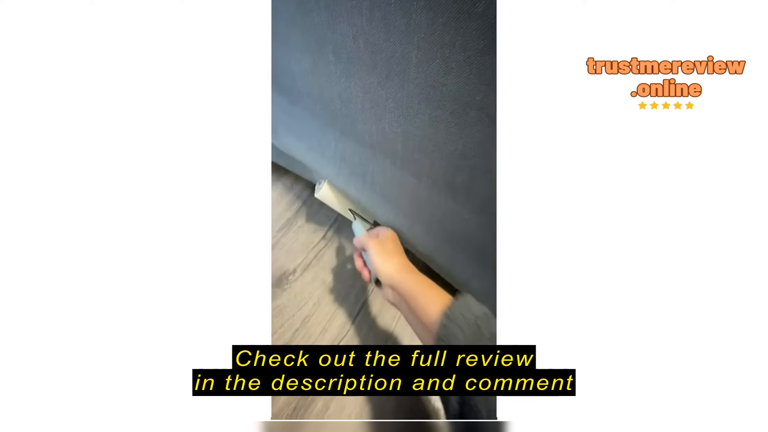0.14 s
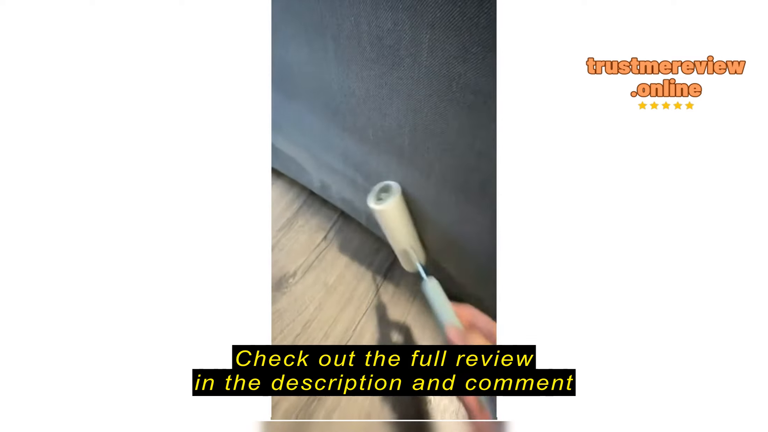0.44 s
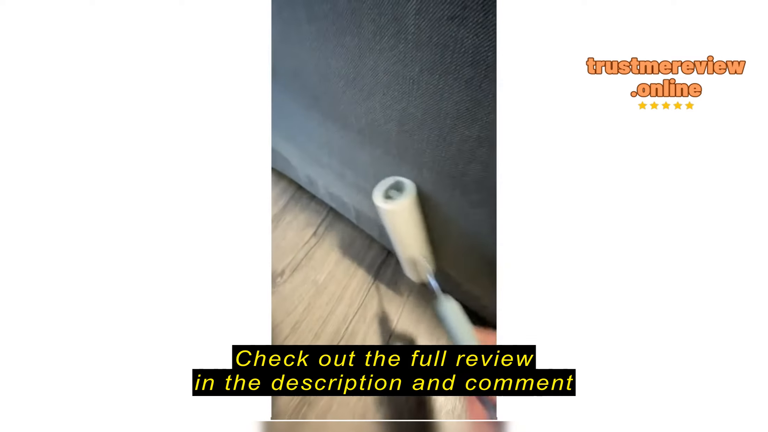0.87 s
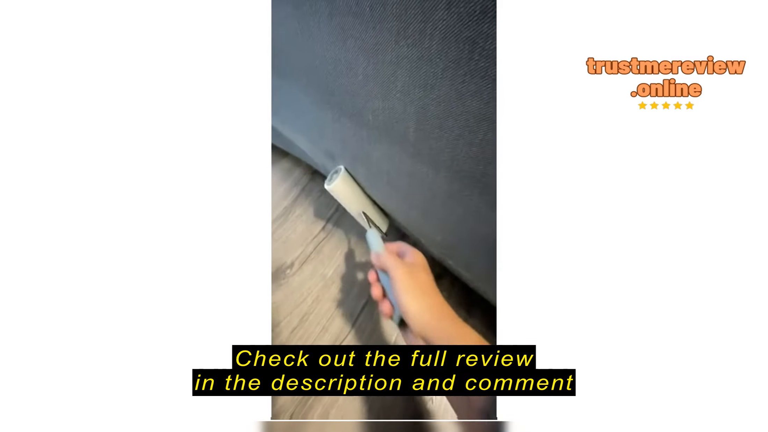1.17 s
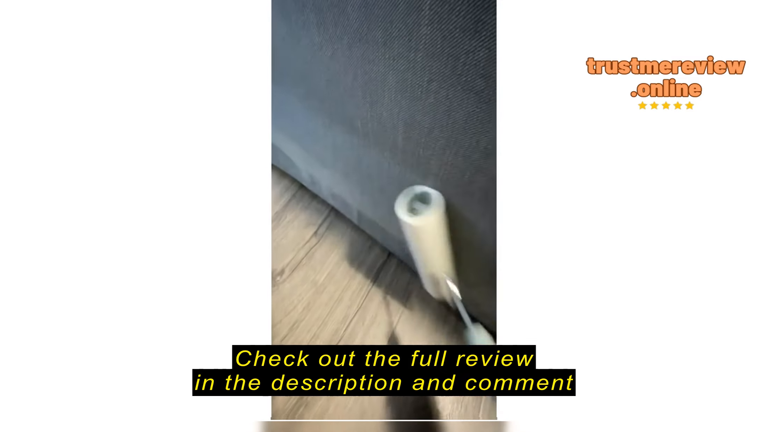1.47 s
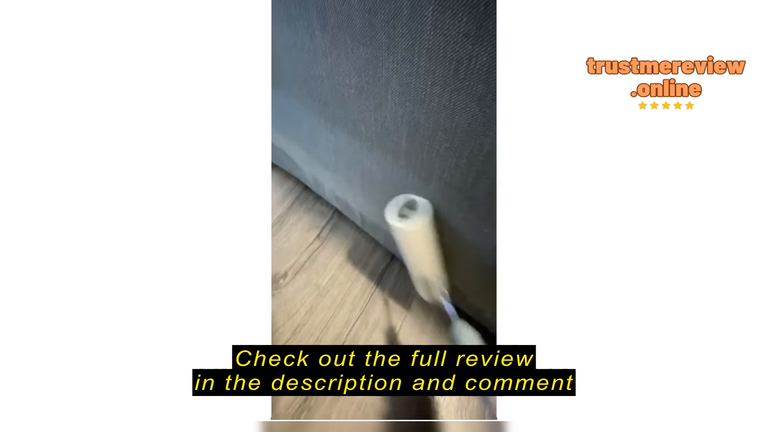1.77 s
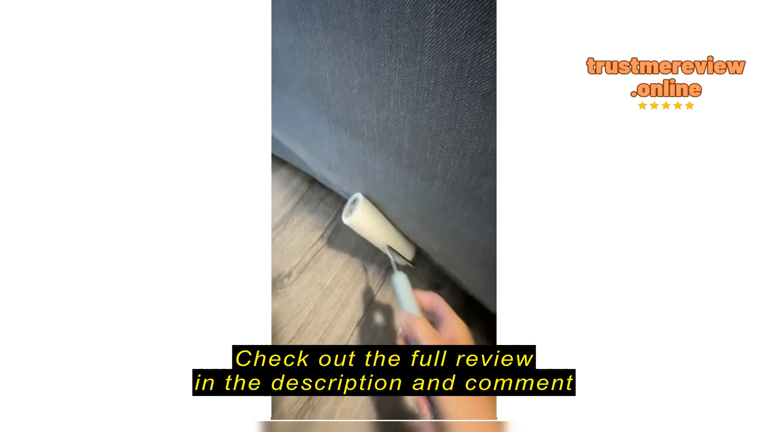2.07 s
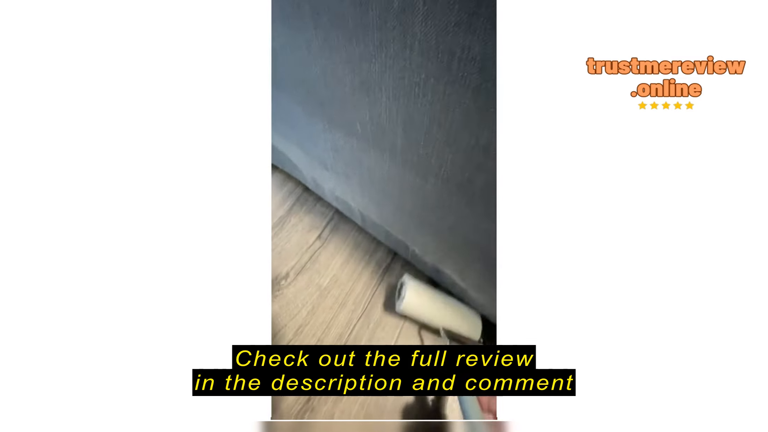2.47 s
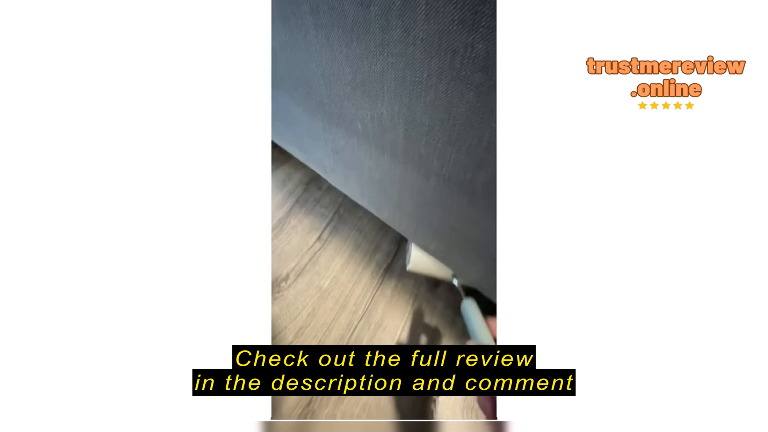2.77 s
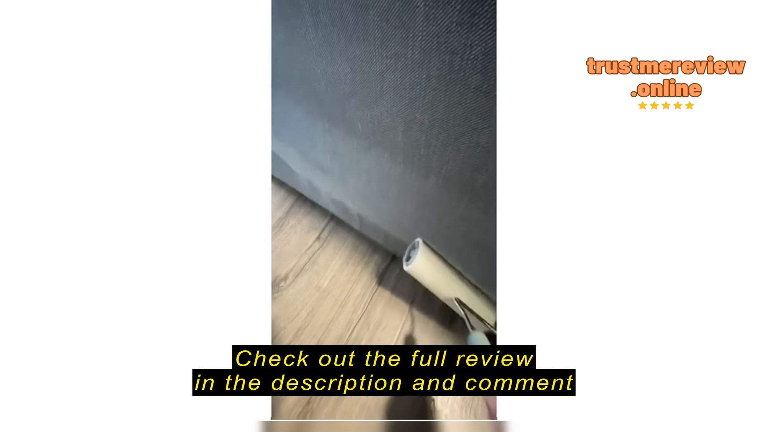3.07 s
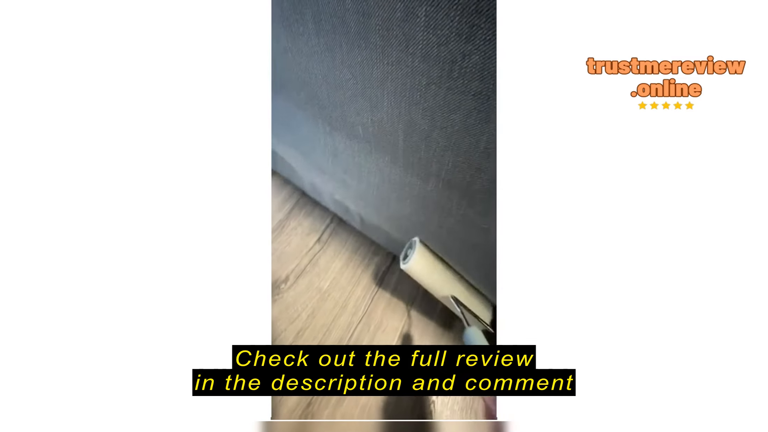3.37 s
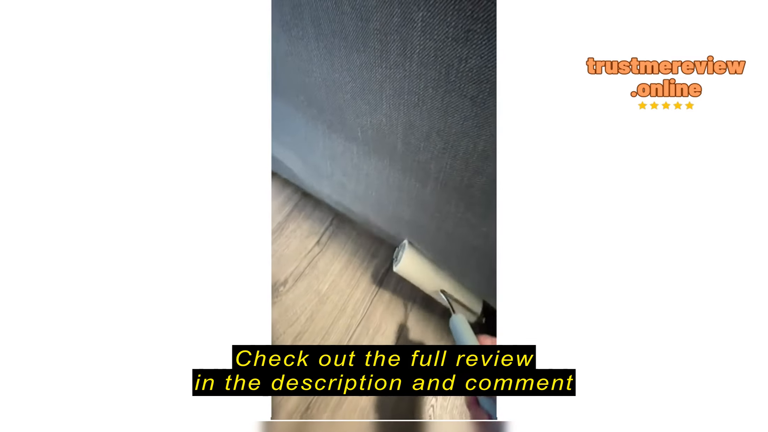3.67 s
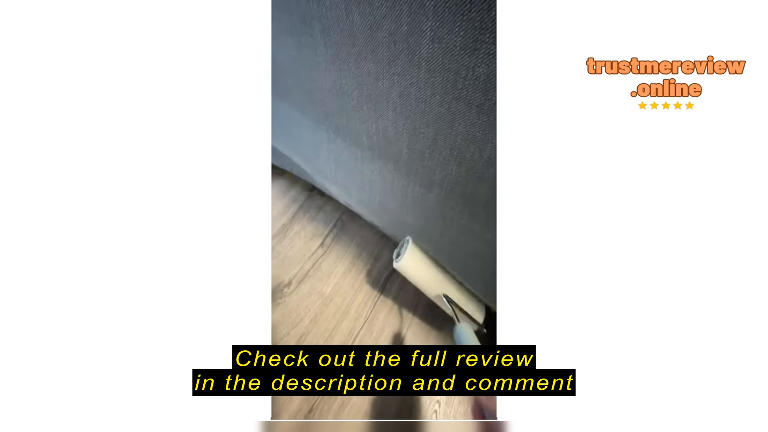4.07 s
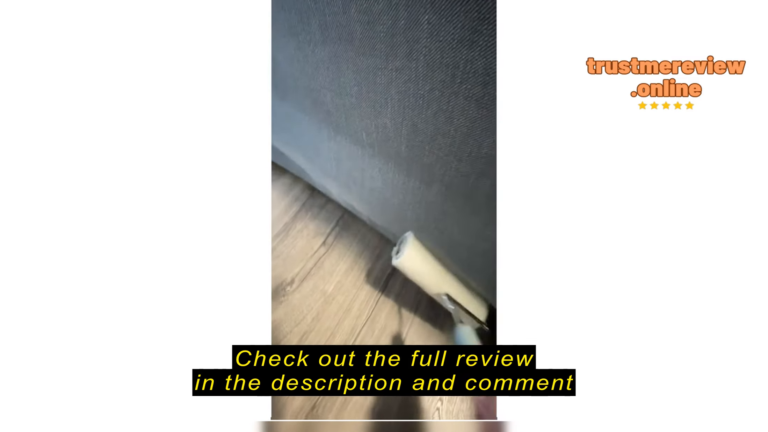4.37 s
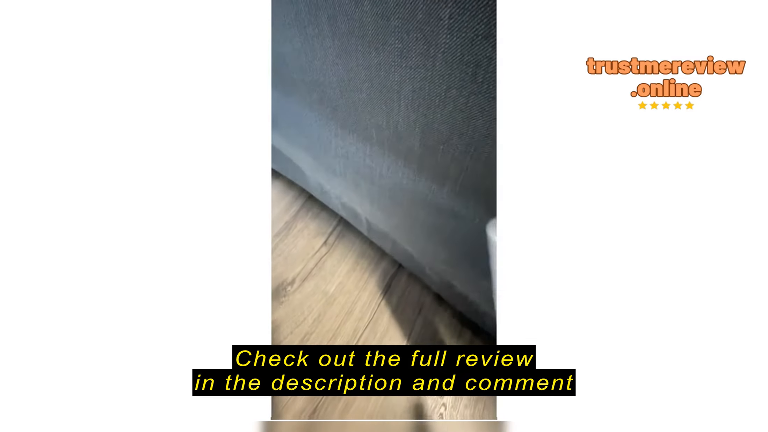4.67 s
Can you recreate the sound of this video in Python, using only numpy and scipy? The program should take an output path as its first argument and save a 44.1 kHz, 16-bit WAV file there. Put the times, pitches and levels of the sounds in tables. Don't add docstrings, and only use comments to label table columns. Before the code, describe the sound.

A hollow plastic lint roller is rubbed back and forth on couch cloth close to a phone microphone in a quiet room. Irregular short strokes hiss and rasp with a hollow tube colour, over faint frame rumble and handle knocks. A soft deep thump lands late, the rubbing ends abruptly, then after a brief silence only quiet room tone returns.

```python
import sys
import numpy as np
from scipy import signal
from scipy.fft import rfft, irfft, next_fast_len
from scipy.io import wavfile
from scipy.ndimage import uniform_filter1d

SR = 44100
rng = np.random.default_rng(int(sys.argv[2]) if len(sys.argv) > 2 else 0)


def invert_db(level):
    return 10 ** (np.asarray(level, dtype=float) / 20)


def unload_audio(sound):
    columns = np.transpose(np.atleast_2d(sound))
    steps = np.round(np.clip(columns, -1, 1) * 32767)
    wavfile.write(sys.argv[1], SR, steps.astype(np.int16))


N = 340893
SIZE = next_fast_len(N)
TIME = np.arange(N) / SR
HZ = np.arange(SIZE // 2 + 1) * SR / SIZE
CUT_S, ROOM_BACK_S = 6.236, 6.49


def shape(x, gain):
    return irfft(rfft(x, SIZE) * gain, SIZE)[..., :N]


def unit(x):
    return x / np.sqrt(np.mean(np.atleast_2d(x).mean(axis=0) ** 2))


def along(table, column=1):
    rows = np.array(table, float)
    return np.interp(np.log(HZ + 1), np.log(rows[:, 0]), rows[:, column])


def resonances(modes):
    power = 0
    for hz, width, db in modes:
        detuning = (HZ - hz) / (width / 2)
        power = power + invert_db(db) ** 2 / (1 + detuning ** 2) ** 2
    return np.sqrt(power)


def box(lo, hi):
    return 1 / (1 + ((2 * HZ - lo - hi) / (hi - lo)) ** 12)


def walk(rate):
    k = int(SR / rate)
    held = np.repeat(rng.standard_normal(N // k + 1), k)
    return 1.64 * uniform_filter1d(uniform_filter1d(held, k), k)[:N]


def patchy(pair, modes, patchy_db, rate):
    return [shape(pair, resonances([mode])) * invert_db(patchy_db * walk(rate)) for mode in modes]


def ring(hz, t60, rise, order=1):
    t = np.arange(int(.3 * SR)) / SR
    return np.sin(2 * np.pi * hz * t) * 1000. ** (-t / t60) * (1 - np.exp(-t / rise)) ** order


def add(out, s, sound):
    i = int(s * SR)
    out[..., i:i + sound.shape[-1]] += sound[..., :N - i]


def sides(pan_db):
    return np.array([[pan_db], [-pan_db]]) / 2


# frequency in Hz, lead of the right side in radians.
LEAD = [(0, 0), (250, .2), (350, .6), (520, 2.5), (1000, 3.2), (1400, 4.2), (2000, 4.6), (2800, 3.7),
        (4100, 4.3), (5200, 5.0), (7350, 3.14), (14700, -3.14), (22050, -9.4)]


def lead():
    return np.exp(1j * np.interp(HZ, *np.transpose(LEAD)))


# frequency in Hz, likeness from 0 to 1, left minus right in dB.
PORTS = [(59.6, 0.88, 0.6), (170, 0.92, -4), (350, 0.51, -3.5), (521, 0.74, -3.5), (980, 0.57, -1.5),
         (1580, 0.5, -2.5), (2430, 0.94, -1), (3720, 0.06, -2), (5200, .7, 0.5), (7300, 0.67, -.4),
         (15000, 0.1, -0.7)]


def ports(shared, own):
    like, pan = np.clip(along(PORTS), 0, 1), invert_db(along(PORTS, column=2) / 2)
    right = shape(shared, like * lead() / pan) + shape(own, np.sqrt(1 - like ** 2) / pan)
    return np.array([shape(shared, pan), right])


# start of full speed in seconds, its end in seconds,
# fibre hiss at first in dB, hiss at last in dB, tube ring above hiss in dB.
STROKES = [(0, 0.228, -56, -61.5, -.5), (0.392, 0.568, -69, -69.5, 0), (0.586, 0.786, -74, -78, 5),
           (0.815, 0.973, -63.5, -60.5, -1), (1.121, 1.18, -64.5, -63.5, 3), (1.25, 1.394, -76.5, -74, 0.5),
           (1.652, 1.804, -74, -73, 4.5), (1.843, 1.98, -83.5, -83, 14.5), (2.15, 2.196, -78, -80.5, 8.5),
           (2.263, 2.435, -61, -67.5, 9), (2.521, 2.638, -71.5, -73, 9), (2.69, 3.014, -82, -71, 6),
           (3.08, 3.286, -80.5, -76.5, 2), (3.439, 3.668, -73.5, -68, 1.5), (3.678, 3.773, -68.5, -72.5, 2),
           (3.974, 4.302, -76, -77, 7), (4.339, 4.448, -66.5, -77, 0.5), (4.557, 4.818, -71.5, -74, 2),
           (4.963, 5.017, -80.5, -76, 14), (5.062, 5.272, -64.5, -66, -2.5),
           (5.546, 5.698, -82, -78.5, 3.5), (5.857, 6.042, -82, -77, 10), (6.148, 6.301, -75.5, -78, 1.5)]
# time in seconds, fibre hiss in dB, tube ring above hiss in dB.
SCUFFS = [(0.302, -80.5, -1), (2.29, -62, 7.5), (0.93, -56.5, -2), (1.345, -68.5, 17.5), (1.437, -73, 8),
          (2.574, -68, 4), (3.326, -72, 1.5), (5.313, -66.5, 11.5), (5.419, -78.5, 6), (1.528, -82, 7),
          (5.49, -82, 3), (3.91, -91, -5), (1.49, -86, 8), (5.223, -65, 3.5), (5.757, -82, 9.5),
          (5.802, -69.5, 6)]


def motion():
    rows = [(*stroke, 300, 348) for stroke in STROKES]
    rows += [(s, s + .001, db, db, tube, 298.5, 350) for s, db, tube in SCUFFS]
    t = TIME[::64]
    rest_db, rest_tube_db = -92.5, 3.5
    power = invert_db(rest_db) ** 2
    ring_db = rest_tube_db * power
    for start, end, first_db, last_db, tube, up, down in rows:
        level = np.interp(t, (start, end), (first_db, last_db))
        level = level - up * np.maximum(start - t, 0) - down * np.maximum(t - end, 0)
        part = invert_db(level) ** 2
        power, ring_db = power + part, ring_db + tube * part
    return np.interp(TIME, t, 10 * np.log10(power)), np.interp(TIME, t, ring_db / power)


def slips(rate, spread_db):
    caught = rng.random((2, N)) < rate / SR
    return caught * rng.standard_normal((2, N)) * invert_db(spread_db * rng.exponential(size=(2, N)))


# frequency in Hz, level in dB per Hz.
FIBRES = [(1500, -23), (2500, -1), (4200, -7.5), (5300, -4.5), (7000, -6.5), (9000, -10), (11000, -11),
          (13500, -14.5), (15500, -8), (16500, -33.5)]
# frequency in Hz, width in Hz, level in dB.
TUBE = [(482, 280, 1), (660, 250, -3), (787, 184, 2), (917, 82, -3.5), (1144, 210, -1.5)]
# frequency in Hz, width in Hz, level in dB.
CLOTH = [(1243, 410, 10.5), (1805, 980, 13.5), (2330, 160, -16.5)]
# time in seconds, tube note in Hz, pressure into the weave in dB.
GRIP = [(0, 680, 3), (.2, 650, 2), (.37, 840, -0.5), (.58, 600, 3.5), (1.0, 780, 2.5), (1.14, 1000, 3.5),
        (1.3, 760, -1.5), (1.55, 620, 4), (2.15, 770, 5), (2.27, 860, 2), (2.4, 868, 1), (2.64, 820, 1),
        (3.0, 720, 3.5), (3.35, 670, 0.5), (3.55, 690, 6), (3.9, 540, 2.5), (4.02, 700, 2), (4.2, 710, 2),
        (4.4, 720, 0.5), (4.9, 630, 3.5), (5.17, 870, 1), (5.42, 480, 0.5), (6.2, 700, 2.5)]


def roller():
    hiss_db, tube_db = motion()
    s, *columns = np.transpose(GRIP)
    note_hz, press_db = (np.interp(TIME, s, c) for c in columns)
    cloth_db = press_db - 0.18 * (hiss_db + 72.5)
    pair = ports(*slips(14000, 1.47))

    pile = shape(pair, invert_db(along(FIBRES)))
    upper = shape(pile, 1 / (1 + (6000 / (HZ + 1)) ** 4))
    pile = (pile - upper) * invert_db(.8 * walk(18)) + upper * invert_db(1.1 * walk(18))
    hiss = unit(pile) * invert_db(3.0)

    damp_db_per_neper, most_damp_db = 58, 17
    share = []
    for hz, *_ in TUBE:
        damp_db = damp_db_per_neper * np.abs(np.log(note_hz / hz))
        share.append(invert_db(-np.minimum(damp_db, most_damp_db)))
    share = np.array(share)
    share = share / np.sqrt(np.mean(share ** 2, axis=0))
    modes = patchy(pair, TUBE, 1.5, 30)
    weave = patchy(pair, CLOTH, 1.5, 20)
    tube = unit(sum(g * m for g, m in zip(share, modes))) * invert_db(tube_db + 0.55)
    cloth = unit(sum(weave)) * invert_db(cloth_db - 1.3)
    return invert_db(hiss_db + 0.69 * walk(30)) * (hiss + tube + cloth)


# time in seconds, rumble in dB, cushion flutter in dB, half length in seconds.
SHOVES = [(0.053, -67, -67, 0.13), (.33, -58.5, -85, 0.17), (0.957, -71, -56.5, 0.11),
          (1.07, -50, -73, 0.074), (1.182, -58, -53, 0.037), (1.274, -52.5, -76, 0.044),
          (1.362, -60, -57.5, 0.064), (1.478, -51, -65, 0.12), (1.9, -59, -61.5, 0.095),
          (2.03, -59, -84, 0.056), (1.756, -64, -59, 0.086), (2.3, -74, -54, .07), (2.414, -55, -61, 0.11),
          (2.788, -65, -58.5, 0.043), (2.872, -54, -62, 0.051), (2.98, -61, -61, 0.15),
          (3.593, -69, -59.5, 0.064), (3.74, -60, -59.5, .06), (4.08, -56, -71, 0.083),
          (4.52, -65, -84, .08), (4.733, -61, -74, 0.041), (5.07, -65, -55.5, 0.042),
          (5.15, -53.5, -60.5, 0.088), (5.321, -53, -55, 0.057), (5.47, -57, -66, 0.035),
          (5.652, -62, -67, .07), (5.857, -54, -57, 0.15)]


def shaken(still_db, column):
    t, rows = TIME[::64], np.array(SHOVES)
    swell = rows[:, column, None] - 7 * ((t - rows[:, :1]) / rows[:, 3:]) ** 2
    return np.interp(TIME, t, np.sqrt(invert_db(still_db) ** 2 + np.sum(invert_db(swell) ** 2, axis=0)))


# frequency in Hz, width in Hz, level in dB.
RUMBLE = [(45, 14, -8.5), (56.6, 29, -3)]
# frequency in Hz, width in Hz, level in dB.
HUM = [(93.54, 6, 1.5), (92.6, 43.4, -14)]
# frequency in Hz, width in Hz, level in dB.
FLUTTER = [(165, 77, -1), (234, 70, -2.5), (330, 114, -7)]
# time in seconds, level in dB.
WEIGHT = [(0, -60.5), (.42, -56), (1.05, -63), (1.19, -72), (1.35, -65.5), (2.0, -66), (2.42, -61.5),
          (2.68, -65), (2.85, -60.5), (3.0, -63.5), (3.5, -55.5), (3.83, -60.5), (4.4, -60), (4.85, -59),
          (5.15, -70), (5.6, -69), (5.87, -60), (6.2, -60)]


def frame():
    hum_db = np.interp(TIME, *np.transpose(WEIGHT))
    pair = ports(*rng.standard_normal((2, N)))
    low = unit(shape(pair, resonances(RUMBLE))) * shaken(-62.5, column=1) * invert_db(-2.5)
    hum = unit(shape(pair, resonances(HUM))) * invert_db(hum_db)
    speed_db = 0.31 * np.minimum(motion()[0] + 74, 0)
    flutter = unit(sum(patchy(pair, FLUTTER, 1.64, 12))) * shaken(-66, column=2) * invert_db(speed_db)
    return low + hum + flutter


# frequency in Hz, level in dB per Hz.
ROOM = [(180, -27), (300, -7.5), (537, -18.5), (1150, -15), (1580, -35.5), (5700, -38.5), (7200, -44.5),
        (16000, -52.5)]


def room():
    return unit(shape(ports(*rng.standard_normal((2, N))), invert_db(along(ROOM)))) * invert_db(-75)


def dropouts(x, fringe):
    for lo, hi, share in fringe:
        lost = np.repeat(rng.random(N // 2048 + 1) < share, 2048)[:N]
        x = x - shape(x, box(lo, hi)) * uniform_filter1d(1. * lost, size=512)
    return x


def mottled(x, spread_db):
    f, _, z = signal.stft(x, SR, nperseg=1024)
    field = uniform_filter1d(rng.standard_normal(z.shape[1:]), size=3, axis=1) * np.sqrt(3)
    field = spread_db * field * np.clip(f / 500, 0, 1)[:, None]
    gain = invert_db(field) / np.sqrt(np.mean(invert_db(field) ** 2, axis=1, keepdims=True))
    return signal.istft(z * gain, SR, nperseg=1024)[1][:, :N]


# low edge in Hz, high edge in Hz.
LOST_MID = [(7100, 7440), (13600, 14900)]
LOST_SIDE = [(10500, 11800)]
# low edge in Hz, high edge in Hz, share of the time lost from 0 to 1.
FRINGE_MID = [(6780, 7150, 0.32), (7530, 8180, .5), (13200, 13650, .5), (14850, 15460, 0.65)]
FRINGE_SIDE = [(10300, 11000, 0.49), (11750, 12150, 0.46)]


def thinned(pair):
    mid = shape(pair[0] + pair[1], 1 - sum(box(*band) for band in LOST_MID)) / 2
    side = shape(pair[0] - pair[1], 1 - sum(box(*band) for band in LOST_SIDE)) / 2
    mid, side = dropouts(mid, FRINGE_MID), dropouts(side, FRINGE_SIDE)
    return mottled(np.array([mid + side, mid - side]), 3.0)


# time in seconds, peak in dB, low ring above peak in
# dB, hardness in dB, tube note in Hz.
KNOCKS = [(0.028, -60, -8, 10, 640), (0.366, -83, -11, -3, 640), (0.386, -68, -10, -5, 640),
          (0.557, -48, -6, -8, 620), (1.3072, -38.5, -17, -30, 760), (1.327, -45, -10, -8, 820),
          (1.338, -48, -8, -10, 800), (1.431, -56, 0, 5, 900), (1.445, -61, 0, 15, 890),
          (1.528, -59, -10, -2, 640), (2.9, -51, -1, -10, 660), (3.566, -39, -5, -15, 620),
          (4.127, -53, -14, 8, 680), (4.336, -57, -3, 11, 660), (4.948, -62, -21, 3, 720),
          (5.0222, -33, -15, -47, 590), (5.33, -46.5, -3.5, -16, 740), (5.782, -58, 0, 9, 640),
          (5.81, -46, -14, 10, 760), (6.16, -75, -14, -10.5, 640),
          (6.741, -60.5, 10, -10, 520)]
# frequency in Hz, 60 dB decay in seconds, lateness in seconds.
HANDLE = [(640, .0105, .0008), (370, .025, .003), (1350, .024, .0003), (1900, .008, 0), (2550, .013, 0),
          (3300, .005, -.0003)]
# time in seconds, peak in dB, frequency in Hz, 60 dB decay in seconds, rise in seconds.
RINGS = [(5.3077, -11.5, 640, .0061, .0014), (5.3091, -44.5, 324, .06, .0003),
         (5.3136, -35, 680, .012, .001), (5.3206, -31, 655, .02, .0016), (5.3235, -48, 296, .02, .0003),
         (5.3066, -49, 2480, .035, .0004), (5.3064, -49, 3100, .008, .0003), (5.308, -57, 1720, .02, .0004),
         (5.3185, -52, 2620, .022, .0006), (5.321, -54, 1700, .012, .0004), (5.754, -56, 2130, .022, .001),
         (5.809, -50, 2400, .018, .0004), (5.81, -52, 1800, .015, .0004), (5.8095, -54, 3100, .004, .0001),
         (5.809, -59, 3850, .01, .0003), (5.811, -39.5, 770, .015, .001), (1.4305, -46, 1500, .014, .0003),
         (1.4306, -48, 2700, .003, .0001), (1.433, -63, 3100, .012, .0003),
         (1.4305, -64, 4000, .008, .0003), (1.452, -62, 1270, .045, .001), (1.339, -54, 1220, .035, .001),
         (1.339, -60, 2300, .015, .0005), (1.328, -58, 1300, .012, .0005), (4.337, -54, 1120, .02, .0006),
         (1.528, -56, 3000, .002, .0001), (1.528, -58, 800, .01, .0004), (2.9, -50, 900, .01, .0004),
         (.557, -50, 2200, .002, .0001), (.557, -46, 500, .012, .0005), (5.782, -58, 1900, .005, .0002)]


def knocks():
    out = np.zeros((2, N))
    taps = KNOCKS
    gain_db = 8.0 + sides(-7)
    detune = 1 + .015 * rng.standard_normal((len(taps), len(HANDLE)))
    detune[:, 0] = np.array(taps)[:, 4] / HANDLE[0][0]
    for (s, db, low_db, hard_db, _), tune in zip(taps, detune):
        tick_db = -16 + .3 * hard_db
        levels = (0, low_db - 5.5, hard_db - 11.5, tick_db - 11.5, tick_db - 1.0, tick_db - 4.5)
        for (hz, t60, late), mode_db, k in zip(HANDLE, levels, tune):
            add(out, s + late, -invert_db(db + gain_db) * invert_db(mode_db) * ring(hz * k, t60, .3 / hz))
    for s, db, hz, t60, rise in RINGS:
        add(out, s, -invert_db(db + gain_db) * ring(hz, t60, rise, order=2))
    return np.array([shape(out[0], 1 / lead()), out[1]])


# time in seconds, peak in dB, frequency in Hz,
# 60 dB decay in seconds, rise in seconds.
THUMP = [
    (5.6876, -23.7, 162, .096, .0021),
    (5.7009, -22, 61.8, .36, .0053),
    (5.7005, -18, 88, .047, .0048),
    (5.7146, -29, 155, .08, .003),
    (5.7182, -32.3, 192, .04, .003),
    (5.7935, -39, 131, .1, .0015),
    (5.7983, -26, 57.4, .1, .0138),
    (5.7, -44, 260, .1, .005),
    (1.33, -40, 200, .07, .003),
    (1.344, -43, 170, .07, .003),
]


def thump():
    out = np.zeros(N)
    for s, db, hz, t60, rise in THUMP:
        add(out, s, -invert_db(db) * ring(hz, t60, rise))
    out = out * np.clip((5.84 - TIME) / 0.0175, 0, 1)
    turns = [invert_db(side * .4) * np.exp(2j * np.pi * HZ * side * .0004) for side in (-1, 1)]
    return np.array([shape(out, turn) for turn in turns])


# start in seconds, end in seconds, level in dB.
BLIP = (6.338, 6.354, -87)


def blip():
    start, end, db = BLIP
    hiss = shape(rng.standard_normal((2, N)), 1 + 3 / (1 + (HZ / 350) ** 4))
    return invert_db(db) * hiss * (TIME > start) * (TIME < end)


# frequency in Hz, level in dB per Hz.
LATER = [(15, -39), (25, -1.5), (84, -10), (117, 3), (145, -13.5), (166, -8.5), (516, -20), (607, -22),
         (911, -19.5), (1440, -28.5), (2300, -30), (2900, -27), (5000, -31), (8140, -39), (13200, -31),
         (15600, -35)]
# frequency in Hz, side minus middle in dB.
LATER_SIDE = [(60, -18), (110, -17), (200, -9), (380, -5), (700, -2.5), (1290, 0), (2380, 2), (4400, 0),
              (8120, -0.5), (15000, 0)]
# time in seconds, level in dB.
BASS_IN = [(6.49, -6), (6.7, -12), (6.85, 10.5), (7.73, 1.5)]
# time in seconds, peak in dB, frequency in Hz,
# left minus right in dB, 60 dB decay in seconds.
TICKS = [
    (7.1358, -55, 5100, -15, .02),
    (7.4235, -56, 5650, -9, .007),
    (7.7102, -52, 5550, -18, .03),
    (7.137, -63, 6600, -15, .012),
    (7.1365, -62, 11500, -15, .012),
    (7.137, -64, 13500, -15, .01),
    (7.4236, -61, 2700, -9, .006),
    (7.424, -63, 6700, -9, .005),
    (7.7102, -54, 4500, -18, .004),
]
# low edge in Hz, high edge in Hz, share of the time lost.
FRINGE_LATER = [(7750, 8400, .85)]
# time in seconds, level in dB.
FADE_IN = [(6.49, -48), (6.53, -12), (6.56, -6), (6.6, -2), (7.4, 0.1), (7.73, -3.5)]


def later_room():
    mid, side = shape(rng.standard_normal((2, N)), invert_db(along(LATER)))
    side = shape(side, invert_db(along(LATER_SIDE)))
    tone = unit(np.array([mid + side, mid - side])) * invert_db(-61.5 + 0.51 * walk(4.6))
    bass = shape(tone, 1 / (1 + (HZ / 90) ** 6))
    tone = tone + bass * (invert_db(np.interp(TIME, *np.transpose(BASS_IN))) - 1)
    tone = mottled(tone, 2.5)
    bounce = int(.0023 * SR)
    for s, db, hz, pan_db, t60 in TICKS:
        tick = ring(hz, .004, .0002) + .4 * ring(hz, t60, .0002)
        tick[bounce:] += invert_db(-3) * tick[:-bounce].copy()
        add(tone, s, invert_db(db + 1.5 + sides(pan_db)) * tick)
    tone = tone + (dropouts(tone, FRINGE_LATER) - tone) * (TIME > 6.95)
    return tone * invert_db(np.interp(TIME, *np.transpose(FADE_IN))) * (TIME > ROOM_BACK_S)


def scene():
    taps = knocks()
    first = thinned(roller() + frame() + room()) + taps + thump()
    ending = np.clip((CUT_S - TIME) / 0.003, 0, 1) ** 2
    return first * ending + taps * (TIME > CUT_S) + blip() + later_room()


def low_pass(x):
    return signal.sosfilt(signal.butter(12, 16160, fs=SR, output="sos"), x)


def record(dry):
    top = 1 / (1 + (HZ / 15750) ** 200)
    heard = shape(dry, top / np.sqrt(1 + (33 / (HZ + 1)) ** 8))
    silent = (TIME > CUT_S) * (TIME < ROOM_BACK_S)
    return low_pass(np.where(silent, dry, heard))


dry = scene()
out = record(dry)
unload_audio(out)
```